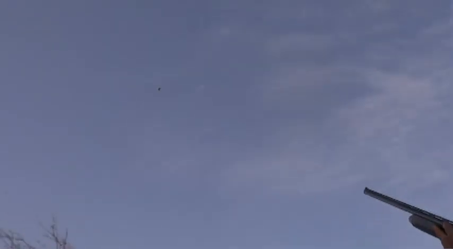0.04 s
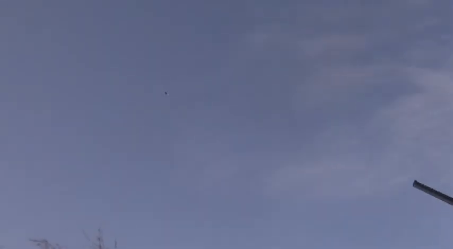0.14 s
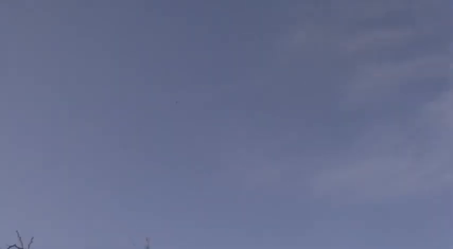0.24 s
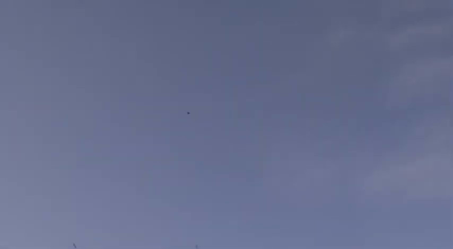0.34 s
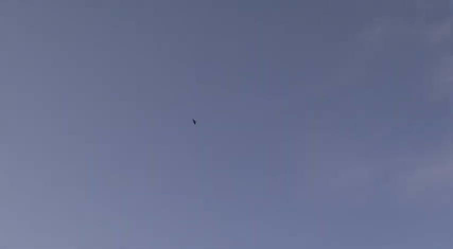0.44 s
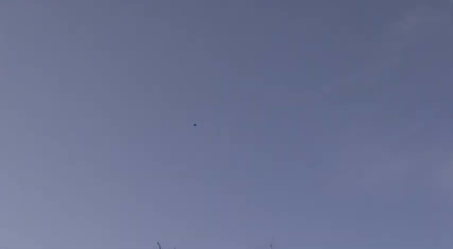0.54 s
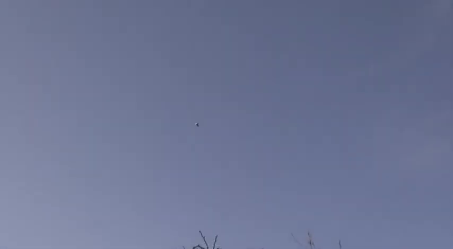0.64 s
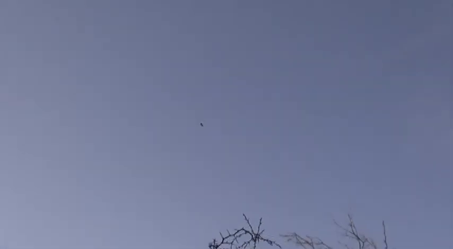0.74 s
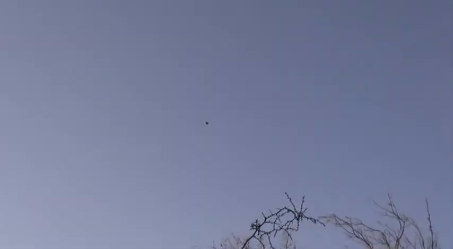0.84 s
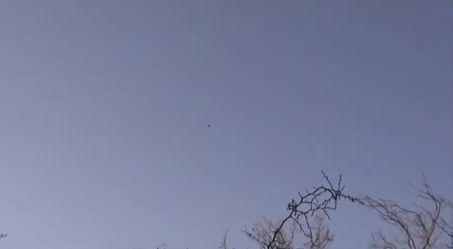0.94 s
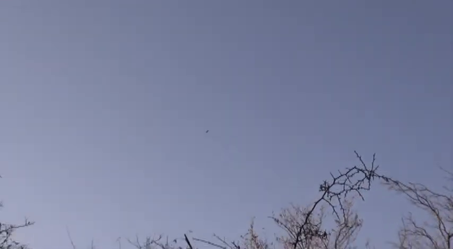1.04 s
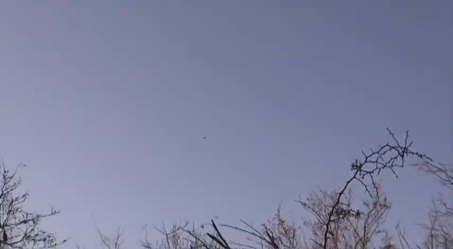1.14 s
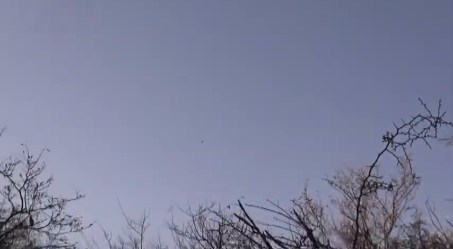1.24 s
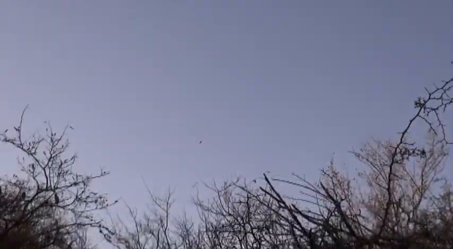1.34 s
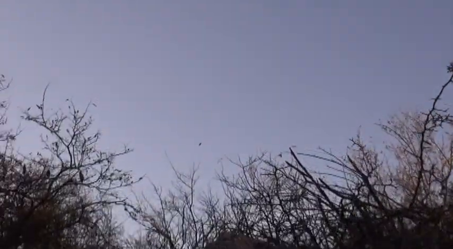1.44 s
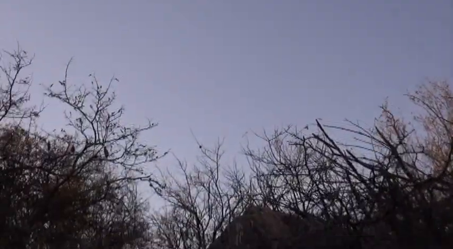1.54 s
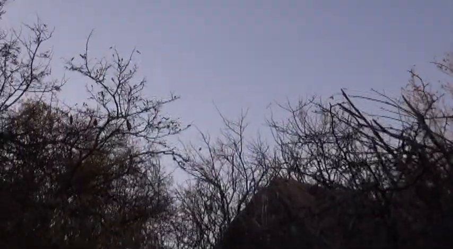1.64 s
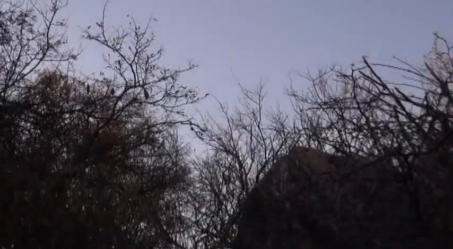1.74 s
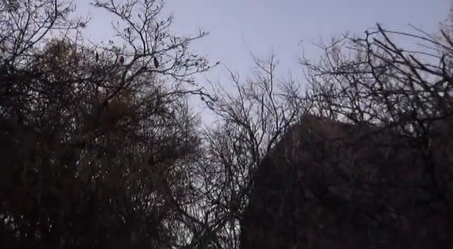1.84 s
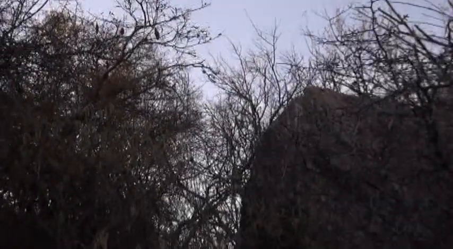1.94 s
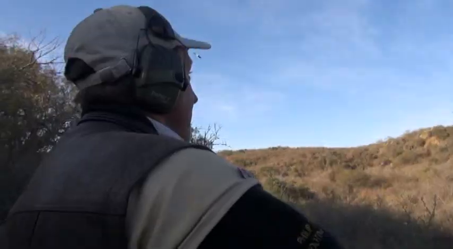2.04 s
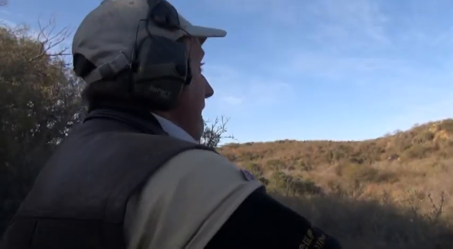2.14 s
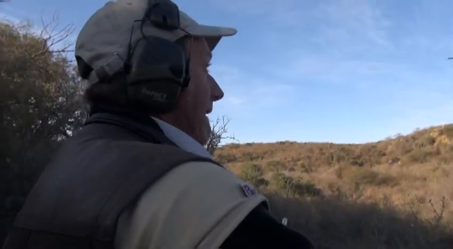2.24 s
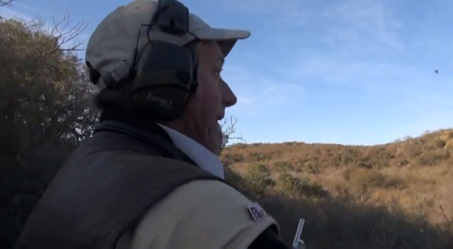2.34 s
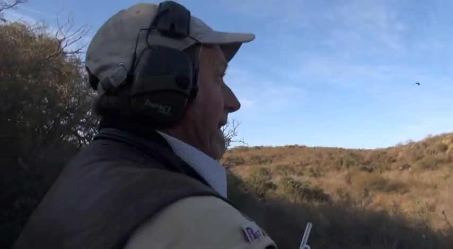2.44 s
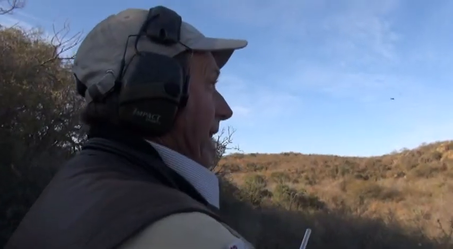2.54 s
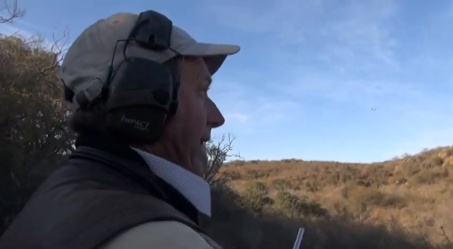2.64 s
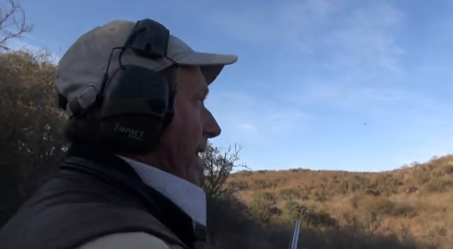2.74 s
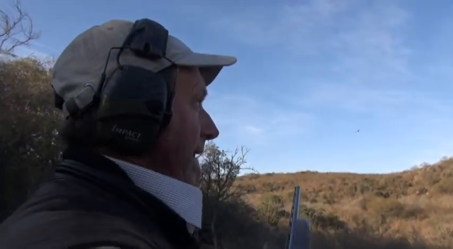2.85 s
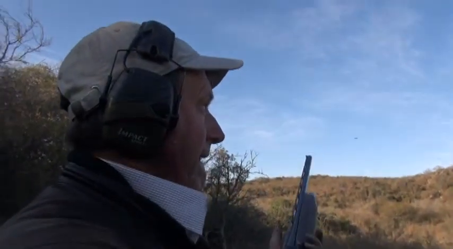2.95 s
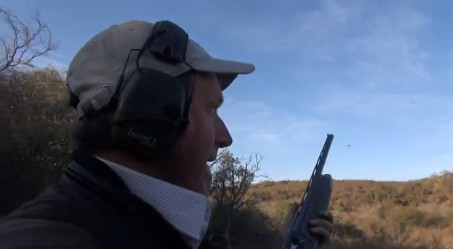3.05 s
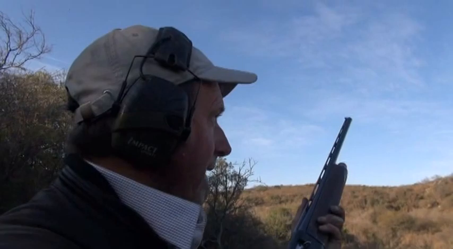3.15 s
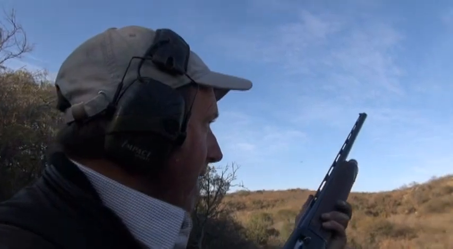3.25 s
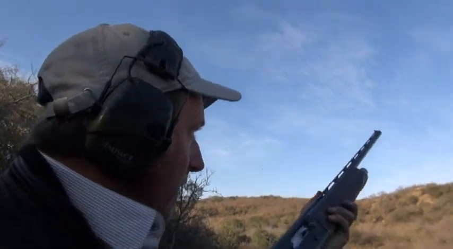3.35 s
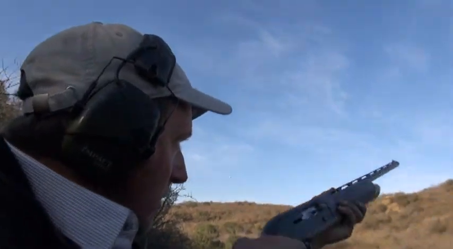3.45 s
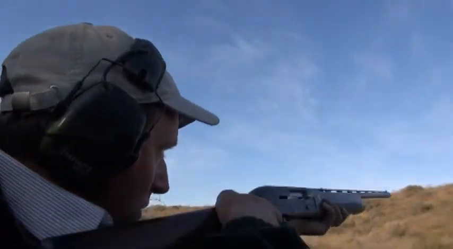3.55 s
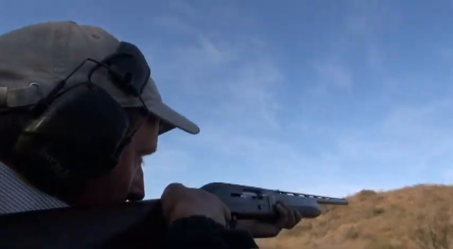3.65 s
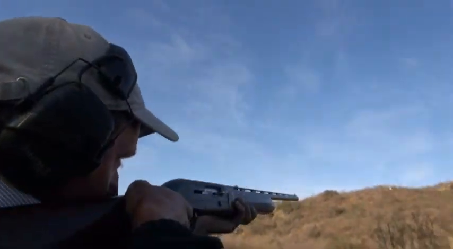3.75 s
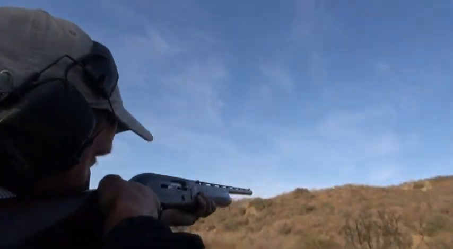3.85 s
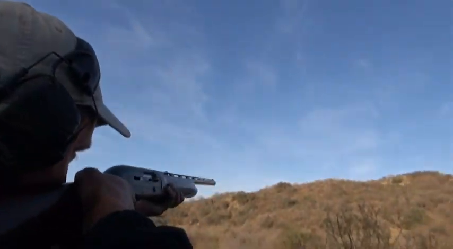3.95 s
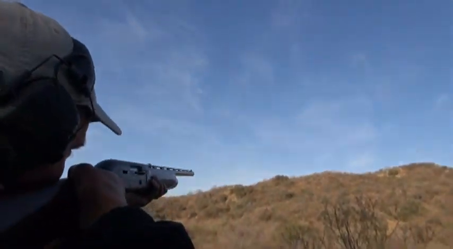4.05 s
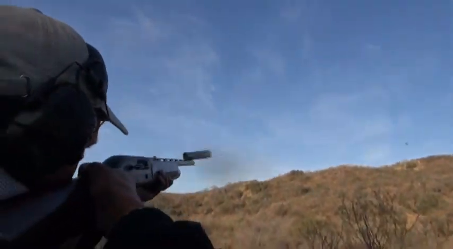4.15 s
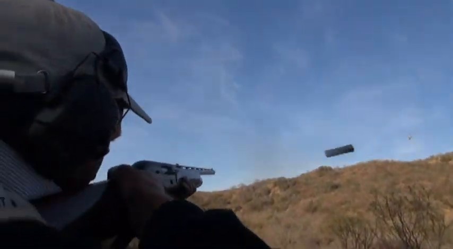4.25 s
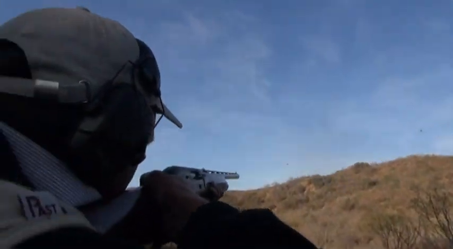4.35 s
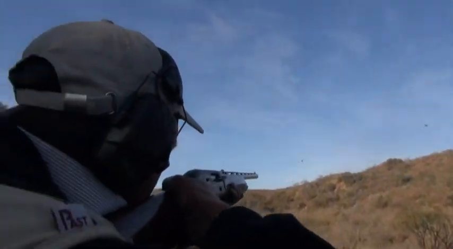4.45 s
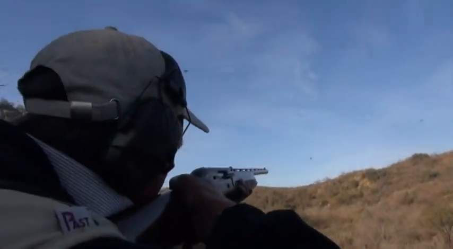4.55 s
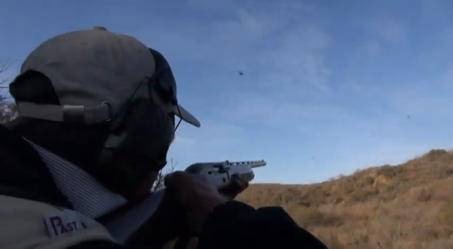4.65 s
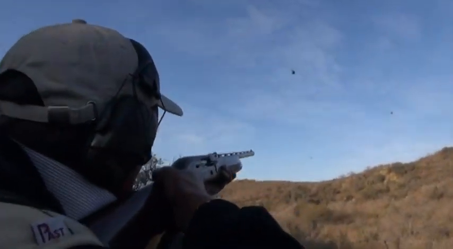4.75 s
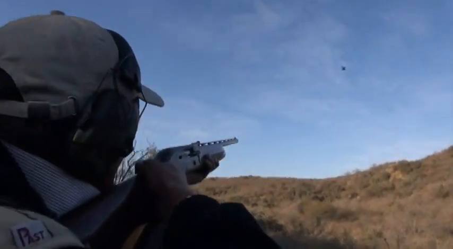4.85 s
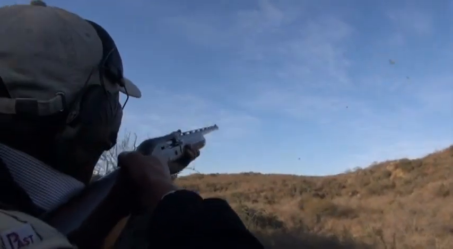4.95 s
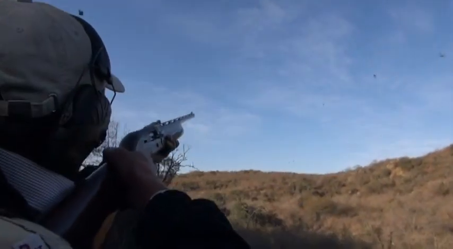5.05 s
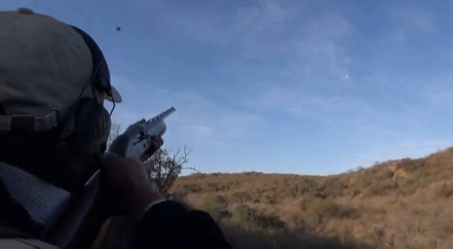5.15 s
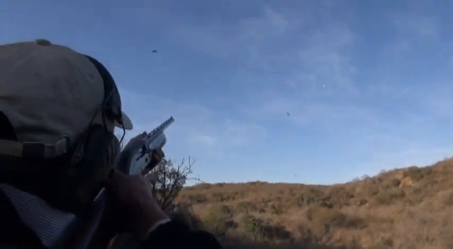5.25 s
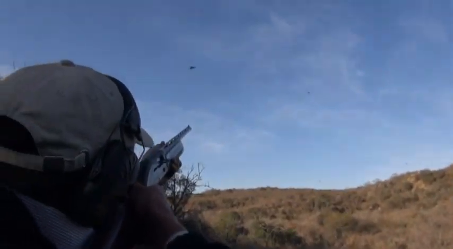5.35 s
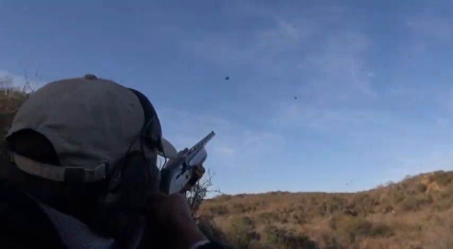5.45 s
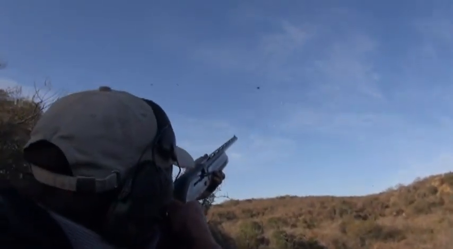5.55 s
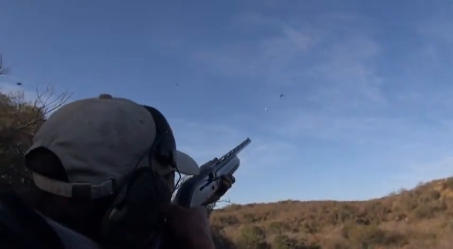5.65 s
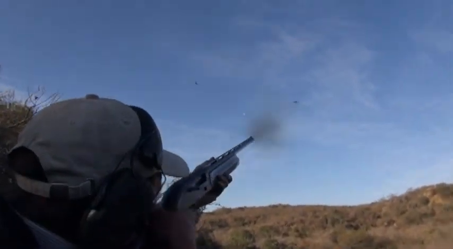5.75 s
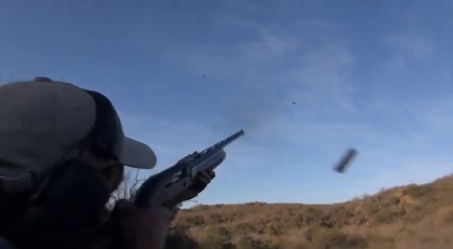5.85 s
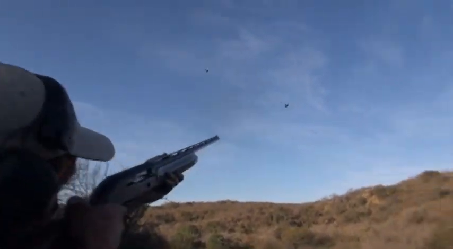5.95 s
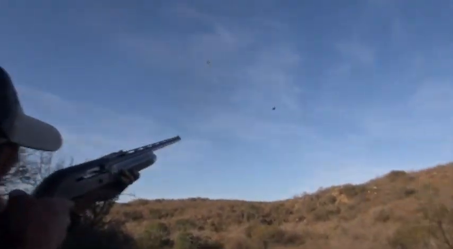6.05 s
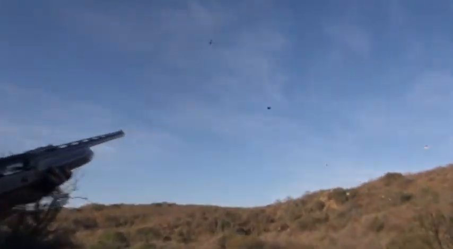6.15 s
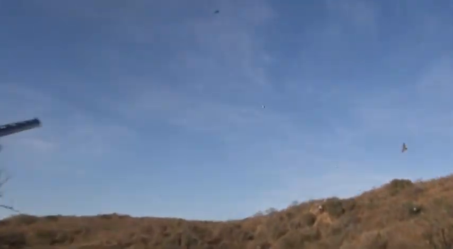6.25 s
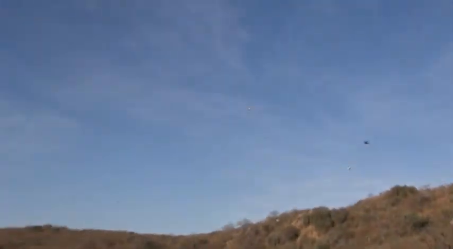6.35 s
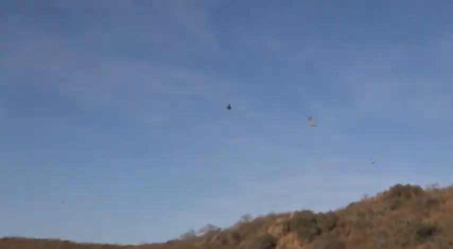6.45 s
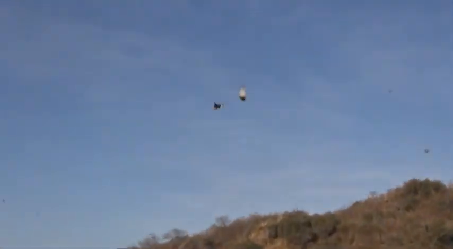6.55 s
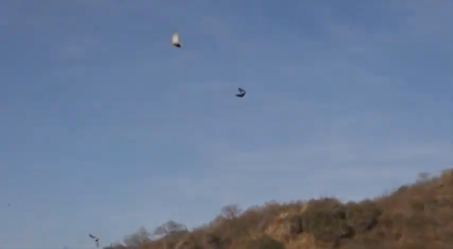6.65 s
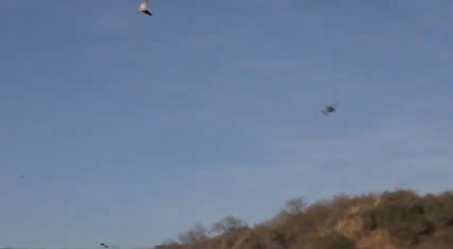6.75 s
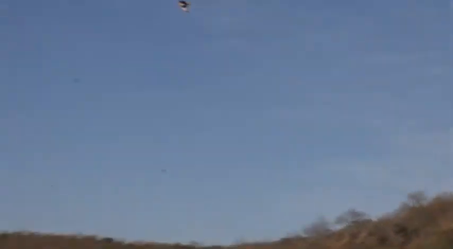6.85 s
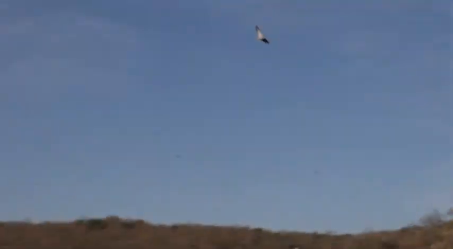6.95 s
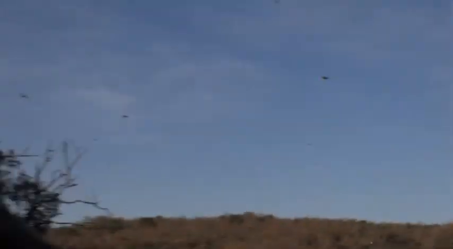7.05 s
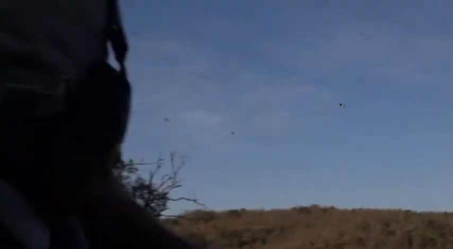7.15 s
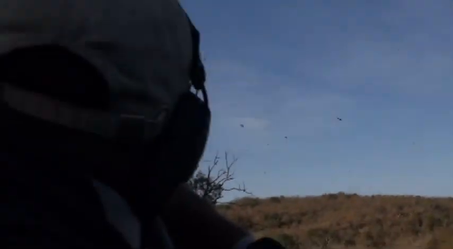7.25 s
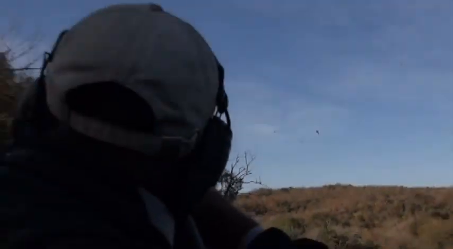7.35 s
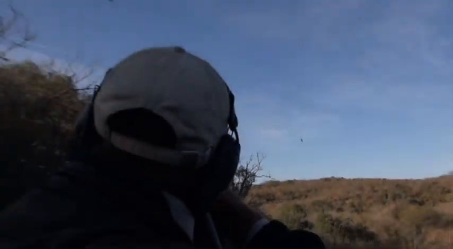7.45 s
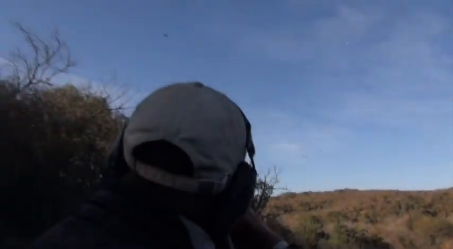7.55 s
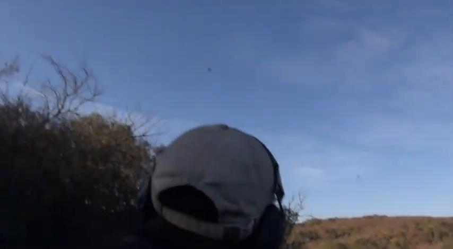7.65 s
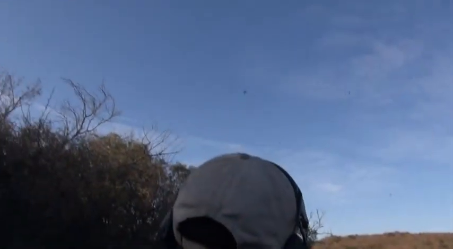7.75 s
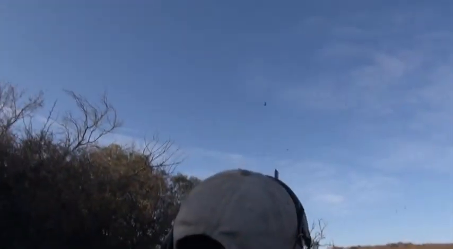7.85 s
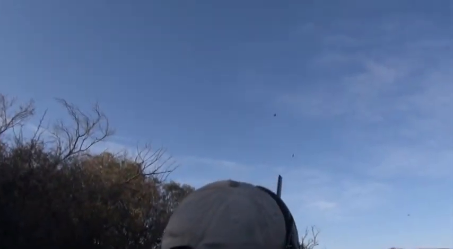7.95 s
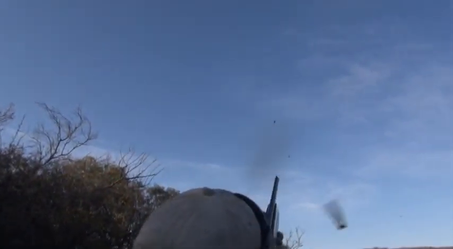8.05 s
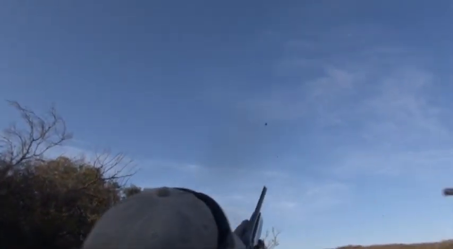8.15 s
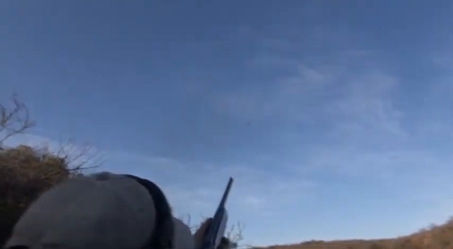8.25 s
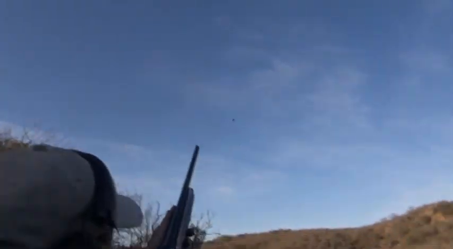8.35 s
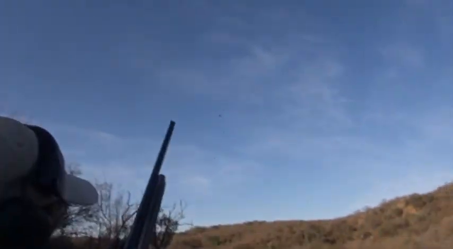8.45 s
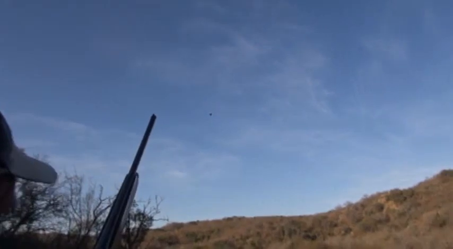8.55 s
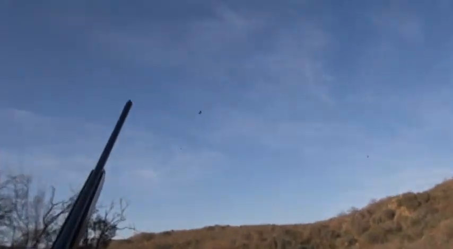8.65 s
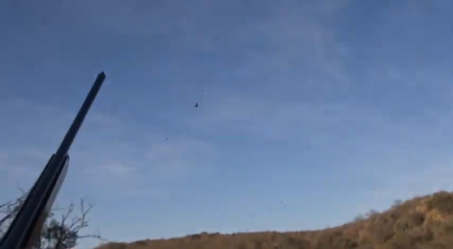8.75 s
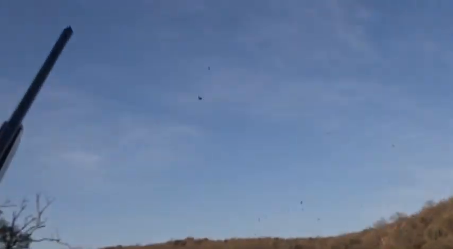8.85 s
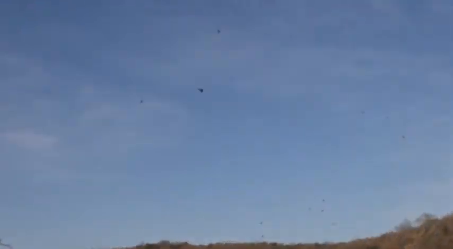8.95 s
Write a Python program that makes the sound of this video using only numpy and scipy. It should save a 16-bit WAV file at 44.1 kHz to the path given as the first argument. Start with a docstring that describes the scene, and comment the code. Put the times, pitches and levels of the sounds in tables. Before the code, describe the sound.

Four close shotgun blasts in open scrubby hills, each slapping off rocks and rolling away, with metallic loading clacks, a creak and rustling between the first two.

```python
"""A self-loading shotgun fires four times, close to the microphone, among dry scrubby hills.
The first shot is under way at once: it crashes through near brush, slaps back from rocks and rolls round the slopes.
Then small things tick, shells click and creak into the magazine, and clothes rustle over quiet air and a breeze.
Three more shots follow, with rustling between. Noise bursts make the blasts, echoes, contacts and cloth;
pressure pulses make the rock slaps, resonances the knocks and creak, and sines the steel ring, hum and whine."""
import sys
import numpy as np
from scipy import signal
from scipy.fft import rfft, irfft, next_fast_len
from scipy.io import wavfile

SR = 44100
rng = np.random.default_rng(int(sys.argv[2]) if len(sys.argv) > 2 else 0)


def digitize_waveform(pressure):
    """Quantize a signal to 16-bit integers and store it at the path in sys.argv[1].

    Rows of a 2-D input are taken as channels; values are limited to [-1, 1].
    """
    field = np.atleast_2d(pressure).T
    bounded = np.clip(field, -1, 1)
    quanta = np.round(bounded * 32767).astype(np.int16)
    wavfile.write(sys.argv[1], SR, quanta)


N = 396459

# The shots; the echoes depend on where the muzzle points. Each row: start in seconds, then relative
# levels in dB of blast, rock echoes and rolling echo, left over right of the rolling echo in dB,
# relative level of the far hill in dB, delay until the bolt shuts in seconds, its relative level in dB.
SHOTS = [(-.018, -16.5, -15.5, -13, -7, -59, 0.21, -29), (4.274, -15.5, 0, 0, -3.5, -50, 0.17, -23),
         (5.9142, -15.5, -2.5, -2.5, -1, -40, .216, -24.5), (8.164, -14.5, -5.5, -7, -3, -42, .201, -31.5)]
# Colour of the gun's hard contacts. Each row: frequency in Hz, relative level in dB per Hz.
GUN = [(200, -32.5), (450, -22), (800, -7), (1400, -3.5), (2100, -3.5), (3200, -0.5), (5000, -3.5),
       (7500, -7.5), (9500, -13), (11500, -16.1), (13000, -27), (15000, -41.5)]


def from_db(db):
    """Decibels to gain."""
    return 10 ** (np.asarray(db) / 20)


def rms_one(x):
    """Scale to rms 1."""
    return x / np.sqrt(np.mean(x ** 2) + 1e-20)


def at_hz(points, hz):
    """Read a spectrum on a log-frequency axis."""
    known, values = np.transpose(points)
    return np.interp(np.log(np.maximum(hz, 1)), np.log(known), values)


def follow(rows, t):
    """Each column of a curve at the times t."""
    s, *columns = np.transpose(rows)
    return [np.interp(t, s, c) for c in columns]


def ages(seconds):
    """Times from the start of a sound."""
    return np.arange(int(seconds * SR)) / SR


def dying(t, t60):
    """A gain that loses 60 dB in t60 seconds."""
    return np.exp(-np.log(1000) * t / t60)


def envelope(t, attack_s, hold_s, fall_db_per_s):
    """A gain that rises, holds and dies away."""
    fall_db = fall_db_per_s * np.maximum(t - attack_s - hold_s, 0)
    return np.clip(t / attack_s, 0, 1) ** 2 * from_db(-fall_db)


def pan(db):
    """Left and right gains that put the left this many dB over the right."""
    return from_db(np.array([[db], [-db]]) / 2)


def add(out, s, sound):
    """Mix a sound in from time s on, cut off at both ends of the scene."""
    at = int(round(s * SR))
    first, last = max(at, 0), min(at + sound.shape[-1], N)
    if last > first:
        out[:, first:last] += sound[..., first - at:last - at]


def noise(spectrum, size, tilt_db=0):
    """Stereo noise of a given colour, tilted in dB per octave, its sides partly alike; rms 1."""
    # How alike the two sides are. Each row: frequency in Hz, left-right correlation.
    likeness = [(100, 0.73), (300, 0.97), (600, 0.82), (1200, 0.42), (2500, 0.55), (5000, 0.7),
                (8000, 0.72), (12000, 0.89)]
    padded = next_fast_len(size)
    hz = np.maximum(np.fft.rfftfreq(padded, 1 / SR), 1)
    mid, side = np.exp(2j * np.pi * rng.random((2, len(hz))))
    alike = np.clip(at_hz(likeness, hz), -1, 1)
    both = np.sqrt(1 + alike) * mid + np.sqrt(1 - alike) * side * [[1], [-1]]
    colour = from_db(at_hz(spectrum, hz) + tilt_db * np.log2(hz))
    return rms_one(irfft(both * colour, padded)[:, :size])


def drift(rate, size):
    """Smooth chance of spread 1, through rate random points per second."""
    knots = rng.standard_normal(2000)
    return rms_one(np.interp(np.arange(size) * rate / SR, np.arange(len(knots)), knots))


def resonate(x, hz, width_hz):
    """A two-pole resonance with gain 1 on top."""
    r = np.exp(-np.pi * width_hz / SR)
    feedback = [1, -2 * r * np.cos(2 * np.pi * hz / SR), r * r]
    return signal.lfilter(np.array([1, 0, -1]) * (1 - r * r) / 2, feedback, x)


def hillside(air_db=-64.5, breeze_db=-77, gust_db=2, lull_s=7.7, lull_half_s=.6, lull_db=-17,
             hum_hz=123.8, hum_db=-78.5, hum_end_s=2.28, whine_hz=13050, whine_db=-88, waver_hz=90):
    """Quiet air, a light breeze with one lull, a faint hum that fades away and a thin wavering whine."""
    # Colours of the quiet air and the breeze. Each row: frequency in Hz, relative level in dB per Hz.
    quiet_air = [(30, -18), (100, -12.5), (180, -9.5), (300, -5.0), (450, 3.0), (700, -3.5), (1200, -2.0),
                 (2000, -7.0), (3500, -12.0), (6000, -15.5), (9000, -20.0), (11500, -24.5), (13000, -27.0),
                 (14500, -31.0), (15500, -31.5)]
    rumble = [(20, -7.5), (60, -1), (120, 2), (250, -7.5), (600, -30)]
    t = np.arange(N) / SR
    lull = np.exp(-.5 * ((t - lull_s) / lull_half_s) ** 2)
    breeze = noise(rumble, N) * from_db(breeze_db + lull_db * lull + gust_db * drift(7.1, N))
    hum_fade = np.clip((hum_end_s - t) / .25, 0, 1) * from_db(2 * drift(6, N))
    hum = from_db(hum_db) * np.sqrt(2) * np.sin(2 * np.pi * hum_hz * t) * hum_fade
    pitch = whine_hz + waver_hz * (drift(3, N) + .5 * drift(200, N))
    whine = from_db(whine_db) * np.sqrt(2) * np.sin(2 * np.pi * np.cumsum(pitch) / SR)
    return from_db(air_db) * noise(quiet_air, N) + breeze + hum + whine


def hammer(level_db=-31, t60=0.022):
    """The hammer snaps just before the report: a short burst of dulled contact noise."""
    t = ages(.02)
    return from_db(level_db) * dying(t, t60) * noise(GUN, len(t), tilt_db=-4.5)


def blast_level(t, crack_delay_s=.0035, crack_db=-1, crack_rise_s=.001, crack_hold_s=.002, crack_fall_db_per_s=1199,
                crash_db=-1, crash_s=.11, sag_db_per_s=11, drop_db=5.5, drop_s=.01, fall_db_per_s=140):
    """The crack stands out above a flat, dense crash, which drops abruptly and leaves a fading tail."""
    after = np.maximum(t - crash_s, 0)
    flat_db = crash_db - sag_db_per_s * np.minimum(t, crash_s)
    tail_db = -drop_db * np.minimum(after / drop_s, 1) - fall_db_per_s * after
    crack = from_db(crack_db) * envelope(t - crack_delay_s, crack_rise_s, crack_hold_s, crack_fall_db_per_s)
    return from_db(flat_db + tail_db) + crack


def blast(lumps_db=2.15, bass_hz=560, bass_end_s=.09, bass_left=.12, ground_s=.003, ground_db=-9,
          treble_hz=8500, treble_t60=.4):
    """The report crashes through the brush, doubled by a near reflection; its bass drops away first."""
    # Colour of the report. Each row: frequency in Hz, relative level in dB per Hz.
    report = [(60, -22), (110, -18.5), (180, 1.5), (300, -7.5), (600, 3.5), (950, 0), (1700, 2),
              (2800, -1.5), (4500, -3), (6800, -4.5), (8800, -14), (11000, -11.5), (13500, -28),
              (15500, -31)]
    t = ages(.6)
    direct = noise(report, len(t))
    reflected = np.array([np.interp(t - ground_s, t, side, left=0) for side in direct])
    crash = rms_one(direct + from_db(ground_db) * reflected)
    bass = signal.sosfiltfilt(signal.butter(2, bass_hz, fs=SR, output="sos"), crash)
    late = np.clip((t - bass_end_s) / .02, 0, 1) * (1 - bass_left)
    # longer paths through the brush lose their treble
    treble = signal.sosfiltfilt(signal.butter(2, treble_hz, "high", fs=SR, output="sos"), crash)
    lost = 1 - dying(np.maximum(t - bass_end_s, 0), treble_t60)
    lumps = from_db(lumps_db * drift(350, len(t)))
    return (crash - late * bass - lost * treble) * blast_level(t) * lumps


def thump(rocks_db, rise_s=.001, hold_s=.007, push_db=-43.5, push_fall_db_per_s=1301,
          boom_db=-52.5, boom_hold_s=.1, boom_fall_db_per_s=73.5, boom_tilt_db=4,
          cliff_delay_s=.225, cliff_db=-44.5, cliff_rise_s=.0087, cliff_fall_db_per_s=349,
          bank_delay_s=.053, bank_db=-37.5, bank_rise_s=.018, bank_fall_db_per_s=603,
          bank_hz=170.2, bank_width_hz=50):
    """The low push of the muzzle gas, its boom, and its returns from a near bank and the largest rock face."""
    # Colour of the low push. Each row: frequency in Hz, relative level in dB per Hz.
    low_colour = [(20, -18.5), (40, -10), (80, -5), (140, -1), (300, -30.5), (1500, -100)]
    t = ages(.7)
    push = from_db(push_db) * envelope(t, rise_s, hold_s, push_fall_db_per_s)
    boom = from_db(boom_db) * envelope(t, rise_s, boom_hold_s, boom_fall_db_per_s)
    cliff = from_db(cliff_db + rocks_db) * envelope(t - cliff_delay_s, cliff_rise_s, hold_s, cliff_fall_db_per_s)
    bank = from_db(bank_db) * envelope(t - bank_delay_s, bank_rise_s, hold_s, bank_fall_db_per_s)
    deep, higher = noise(low_colour, len(t)), noise(low_colour, len(t), boom_tilt_db)
    bank_note = rms_one(resonate(higher, bank_hz, bank_width_hz))
    return deep * push + higher * (boom + cliff) + bank_note * bank


def slap(hz=610, width_hz=240, pulse_s=.0012, scatter_db=-18, scatter_t60=.06):
    """A rock face returns the N-shaped pressure pulse, narrowed to a hollow bark by the ground."""
    t = ages(.06)
    pulse = (1 - 2 * t / pulse_s) * (t < pulse_s)
    rough = from_db(scatter_db) * rng.standard_normal((2, len(t))) * dying(t, scatter_t60)
    centre = hz * np.exp(rng.normal(0, 0.19))
    bark = resonate(resonate(pulse + rough, centre, width_hz), centre, 2 * width_hz)
    return bark / np.abs(bark).max()


def roll_level(t, level_db=-28, rise_s=.16, near_s=.24, db_per_doubling=5, roll_end_s=1.202, fall_db_per_s=170):
    """The roll builds up, weakens as its path grows and spreads, holds on, then dies away quickly."""
    spreading_db = db_per_doubling * np.log2(np.maximum(t / near_s, 1))
    return from_db(level_db - spreading_db) * envelope(t, rise_s, roll_end_s - rise_s, fall_db_per_s)


def roll(colour_age_s=.5, air_db_per_hz_s=0.0066, lumps_db=1.43, patchy_db=1.5, bass_db_per_s=9, bass_hz=300):
    """Countless echoes from the slopes: the air takes the treble, while the bass carries furthest."""
    # Colour of the roll at colour_age_s. Each row: frequency in Hz, relative level in dB per Hz.
    slopes = [(60, -31.5), (120, -29.5), (200, -18), (300, -9), (450, 0), (650, 1), (1000, -2),
              (1500, -2.5), (2200, -10), (3200, -16), (5000, -25.5), (7500, -37), (10000, -51),
              (14000, -69.5)]
    t = ages(1.6)
    spectrum = rfft(noise(slopes, len(t)))
    hz = np.fft.rfftfreq(len(t), 1 / SR)
    edges = np.geomspace(50, 16000, 13)
    out = 0
    for low, high in zip(edges, edges[1:]):
        band = irfft(spectrum * ((hz >= low) & (hz < high)), len(t))
        centre = np.sqrt(low * high)
        patches = patchy_db * drift(70, len(t)) / (1 + centre / 2500)
        db_per_s = bass_db_per_s * (centre < bass_hz) - air_db_per_hz_s * centre
        out = out + band * from_db(patches + db_per_s * (t - colour_age_s))
    return out * roll_level(t) * from_db(lumps_db * drift(90, len(t)))


def far_hill(rise_s=.008, hold_s=.033, fall_db_per_s=200, lumps_db=3):
    """A dull, lumpy swell of noise from one distant hillside."""
    # Colour of the far answer. Each row: frequency in Hz, relative level in dB per Hz.
    swell = [(71, -66), (120, -36), (285, 0), (371, -14), (443, 2.5), (740, -18), (1040, -8.5), (4000, -41),
             (5200, -69), (8800, -120)]
    t = ages(.4)
    level = envelope(t, rise_s, hold_s, fall_db_per_s)
    return noise(swell, len(t)) * level * from_db(lumps_db * drift(91, len(t)))


def gunfire(lock_time_s=0.0056, far_hill_delay_s=1.02):
    """Every shot wakes the same rocks and slopes."""
    # Rock faces. Each row: echo delay in seconds, relative peak in dB, left over right in dB.
    rocks = [(.014, -17.5, 2.5), (.061, -14.5, -4), (.166, -21.5, 8), (.176, -14, -10), (.228, -16.5, -8.5),
             (.238, -7.5, 0), (.248, -14, -5), (.264, -13, -5), (.304, -19, -8), (.315, -21.5, -11)]
    out = np.zeros((2, N))
    for s, blast_db, rocks_db, roll_db, side_db, far_db, _, _ in SHOTS:
        add(out, s - lock_time_s, hammer())
        add(out, s, from_db(blast_db) * pan(1.6) * blast())
        add(out, s, thump(rocks_db))
        add(out, s, from_db(roll_db) * pan(side_db) * roll())
        add(out, s + far_hill_delay_s, from_db(far_db) * far_hill())
        for delay, db, rock_side_db in rocks:
            add(out, s + delay, from_db(rocks_db + db) * pan(rock_side_db) * slap())
    return out


def bolt_clacks(open_s=.12, open_db=-22, open_t60=.056, shut_t60=.014, tilt_db=3):
    """After each shot the bolt hits its rear stop, then shuts on a new shell; rows as in clacks."""
    opens = [(s + open_s, open_db, tilt_db, open_t60) for s, *_ in SHOTS]
    shuts = [(s + delay, db, tilt_db, shut_t60) for s, *_, delay, db in SHOTS]
    return opens + shuts


def jostle_clacks(start_s=2.3, end_s=2.5, count=7, level_db=-44, uneven_db=6, tilt_db=-4, t60=.035):
    """Loose shells jostle in the hand: light, unevenly spaced contacts; rows as in clacks."""
    step = (end_s - start_s) / count
    return [(start_s + step * (k + when), level_db + uneven_db * (force - .5), tilt_db, t60)
            for k, (when, force) in enumerate(rng.random((count, 2)))]


def contact_rise(t, rise_s=0.00036):
    """The very short onset of a hard contact."""
    return 1 - np.exp(-t / rise_s)


def clacks(level_db=4, ring_db=-31, ring_t60=0.084, steel_db=-25):
    """Hard contacts are brief noise bursts that leave the steel ringing in its own modes."""
    # Shells against the gate and carrier. Each row: start in seconds, relative level in dB,
    # brightness in dB per octave, contact t60 in seconds.
    shell_contacts = [(2.007, -46, 1.5, 0.15), (2.012, -29.5, 0, 0.011), (2.059, -24, 0.5, 0.0067),
                      (2.141, -46.5, -2, 0.12), (2.165, -33, -3.5, 0.036), (2.33, -37.5, 1.5, 0.011),
                      (2.411, -37, 3, .012), (2.4235, -25.5, 2, 0.0076), (2.452, -37, -4, .025),
                      (2.501, -14.5, 0.5, 0.023), (2.5582, -37, 0, 0.034), (2.6144, -7, -0.5, 0.0071),
                      (2.514, -32, 0, 0.028), (2.6358, -25, 0, 0.0083), (2.679, -25, 3.5, 0.0063),
                      (2.6995, -28, 1, .008), (3.7075, -18.5, -0.3, 0.012), (6.3215, -35, 0, 0.015),
                      (7.134, -43, -2.5, 0.044), (7.152, -45.5, -2.5, 0.069)]
    # Ringing of the steel. Each row: frequency in Hz, relative level in dB, t60 in seconds.
    steel_modes = [(1400, -5.5, 0.049), (1800, -4.5, .05), (2750, -0.5, .05), (3880, -6.5, 0.034),
                   (4670, -9.5, 0.028), (7650, -6, 0.027)]
    out, t = np.zeros((2, N)), ages(.15)
    for s, db, tilt_db, t60 in shell_contacts + bolt_clacks() + jostle_clacks():
        contact = dying(t, t60) * noise(GUN, len(t), tilt_db)
        after = from_db(ring_db) * dying(t, ring_t60) * noise(GUN, len(t), tilt_db - 7)
        steel = 0
        for hz, mode_db, mode_t60 in steel_modes:
            strength = from_db(steel_db + mode_db + rng.normal(0, 2))
            steel = steel + strength * dying(t, mode_t60) * np.sin(2 * np.pi * (hz * t + rng.random()))
        add(out, s, from_db(level_db + db) * contact_rise(t) * (contact + after + steel) * pan(-1))
    return out


def ticks(level_db=-3.5, t60=0.016, settle_db=-14, settle_t60=0.14):
    """Grit, hulls and twigs tick drily: bright noise with a fast decay and a weak slower one."""
    # Small dry ticks. Each row: start in seconds, relative level in dB.
    small_ticks = [(.707, -43.5), (0.768, -43.5), (.845, -46), (0.878, -45.5), (1.113, -47), (1.38, -46.5),
                   (4.726, -41.5), (4.781, -43.5), (4.834, -42.5), (5.219, -44.5), (5.286, -48.5),
                   (5.477, -34.5), (6.306, -30.5), (6.608, -43), (6.73, -42), (7.018, -41), (8.885, -42.5)]
    # Their colour. Each row: frequency in Hz, relative level in dB per Hz.
    tick_colour = [(1500, -15), (3000, -2), (4500, 5), (7000, 0.5), (11000, -7), (15000, -26)]
    out, t = np.zeros((2, N)), ages(.15)
    fade = dying(t, t60) + from_db(settle_db) * dying(t, settle_t60)
    for s, db in small_ticks:
        add(out, s, from_db(level_db + db) * contact_rise(t) * fade * noise(tick_colour, len(t)))
    return out


def scuff_knocks(start_s=3.036, length_s=.08, count=7, level_db=-34, fade_db=6, centre_hz=1010, spread_octaves=1.0):
    """A hand scuffs along the stock in a fading run of soft catches; rows as in knocks."""
    return [(start_s + length_s * (k + when / 2) / count,
             level_db - fade_db * k / count,
             centre_hz * 2 ** (spread_octaves * (pitch - .5)))
            for k, (when, pitch) in enumerate(rng.random((count, 2)))]


def knocks(level_db=1.0, cycles=18):
    """Soft contacts: a noise burst through one broad resonance, its decay a set number of cycles."""
    # Dull knocks. Each row: start in seconds, relative peak in dB, pitch in Hz.
    dull_knocks = [(1.409, -55, 346), (1.752, -42, 1120), (2.063, -36, 1300), (2.269, -33, 1260),
                   (2.7335, -25, 1050), (3.786, -36, 1890), (7.136, -33, 1350), (7.152, -30.5, 1330),
                   (7.205, -48, 704), (7.266, -44, 604), (7.929, -44.5, 1200)]
    colour = [(300, -2.0), (4000, -12.0), (12000, -34.0)]   # Hz, relative dB per Hz
    out, t = np.zeros((2, N)), ages(.15)
    for s, db, hz in dull_knocks + scuff_knocks():
        burst = noise(colour, len(t)) * dying(t, cycles / hz)
        knock = resonate(burst, hz, hz * 0.32)
        add(out, s, from_db(level_db + db) * knock / np.abs(knock).max())
    return out


def handling(low_hz=650):
    """Hard and soft contacts together; the small hard parts radiate no bass."""
    thin = signal.butter(2, low_hz, "high", fs=SR, output="sos")
    return knocks() + signal.sosfilt(thin, clacks() + ticks())


def rustle(rise_s=.024, fall_db_per_s=80.5, buffet_rough_db=4, cloth_rough_db=1.3, folds_db=0.8, buffet_tilt_db=1):
    """Sleeves brush and stir the air in swells of noise as the shooter turns, loads, raises and swings the gun."""
    # The movements. Each row: start in seconds, hold in seconds, relative level of the buffeting in dB,
    # relative level of the cloth in dB, cloth brightness in dB per octave.
    moves = [(2.119, 0.12, -57.5, -60, 2.5), (2.307, 0.24, -67.5, -52, -.5),
             (2.679, 0.075, -55.5, -51, -0.5), (2.901, 0.1, -73, -63.5, -0.5), (3.034, 0.2, -69, -55, 0),
             (3.289, .31, -53, -56, 1.5), (3.715, .03, -62.5, -57, 0), (4.06, 0.11, -71.5, -67, -2.5),
             (5.677, 0.11, -73.5, -66, -1), (5.781, .09, -58, -61.5, 0), (8.019, .03, -85, -64.5, -1)]
    # Colours of buffeted air and cloth. Each row: frequency in Hz, relative level in dB per Hz.
    buffet_colour = [(18, -44.5), (30, -11.5), (150, 1.5), (362, -7.5), (417, -12), (461, -11), (555, -13),
                     (900, -16.5), (1170, -45.5), (1980, -120)]
    cloth_colour = [(200, -15.5), (500, -3.5), (900, -1), (1500, -1.5), (2600, -5), (4000, -9),
                    (6000, -10.5), (8000, -16), (11000, -21.5), (15000, -41.5)]
    out, t = np.zeros((2, N)), ages(1)
    for s, hold_s, buffet_db, cloth_db, tilt_db in moves:
        effort = envelope(t, rise_s, hold_s, fall_db_per_s)
        buffet_level = from_db(buffet_db + buffet_rough_db * drift(50, len(t)))
        buffet = noise(buffet_colour, len(t), buffet_tilt_db) * buffet_level
        texture_db = cloth_rough_db * drift(130, len(t)) + folds_db * drift(27, len(t))
        cloth = noise(cloth_colour, len(t), tilt_db) * from_db(cloth_db + texture_db)
        add(out, s, effort * (buffet + cloth))
    return out


def hollow_note(s=2.501, start_hz=620, end_hz=385, sink_s=0.016, level_db=-45, t60=0.34, rise_s=.002):
    """A short hollow note sinks in pitch as a shell goes in."""
    out, t = np.zeros((2, N)), ages(.15)
    hz = end_hz + (start_hz - end_hz) * np.exp(-t / sink_s)
    level = from_db(level_db) * np.minimum(t / rise_s, 1) * dying(t, t60)
    add(out, s, level * np.sin(2 * np.pi * np.cumsum(hz) / SR))
    return out


def creak(grit_db=-10):
    """A shell sticks and slips; each slip rings the magazine tube, never twice quite alike."""
    # Course of the creak. Each row: time in seconds, mean slips per second, peak level in dB.
    course = [(2.71, 220, -24), (2.73, 230, -28), (2.75, 380, -27), (2.765, 190, -31.5), (2.8, 195, -27.5),
              (2.82, 128, -35.5), (2.832, 94, -29)]
    # Ringing of the tube. Each row: frequency in Hz, width in Hz, relative level in dB.
    tube_modes = [(1200, 92, -7.5), (1690, 160, -6.5), (2530, 300, -2), (3300, 340, -3), (4400, 500, -2.5),
                  (6000, 1100, -8), (7860, 380, -2.5), (11100, 990, -9.5)]
    out, age = np.zeros((2, N)), ages(.012)
    hz, width_hz, mode_db = np.transpose(tube_modes)[:, :, None]
    modes = from_db(mode_db) * np.exp((2j * hz - width_hz) * np.pi * age)
    chance = rng.standard_normal((64, 2, 2, len(hz)))   # slip, real or imaginary, side, mode
    s = course[0][0]
    for real, imaginary in chance:
        rate, db = follow(course, s)
        strengths = (-1) ** np.arange(len(hz)) + from_db(grit_db) * (real + 1j * imaginary)
        slip = (strengths @ modes).imag
        add(out, s, from_db(db) * slip / np.abs(slip).max() * (s < course[-1][0]))
        s += np.exp(0.15 * imaginary[0, 0]) / rate
    return out


def scene():
    """Shots, gun handling and clothing over the quiet hillside."""
    return hillside() + gunfire() + handling() + rustle() + hollow_note() + creak()


def record(dry, top=0.8, cutoff_hz=15950):
    """The highest peaks are rounded, then the top of the treble is cut."""
    rounded = top * np.tanh(dry / top)
    return signal.sosfilt(signal.ellip(10, .1, 80, cutoff_hz, fs=SR, output="sos"), rounded)


dry = scene()
out = record(dry)
digitize_waveform(out)
```